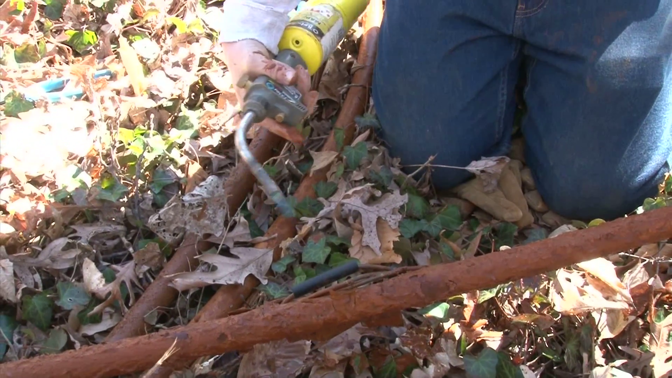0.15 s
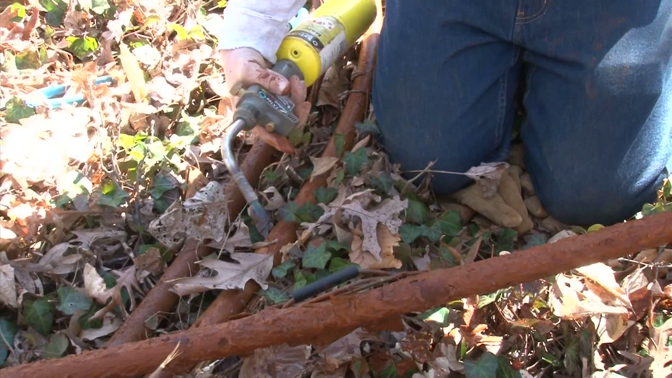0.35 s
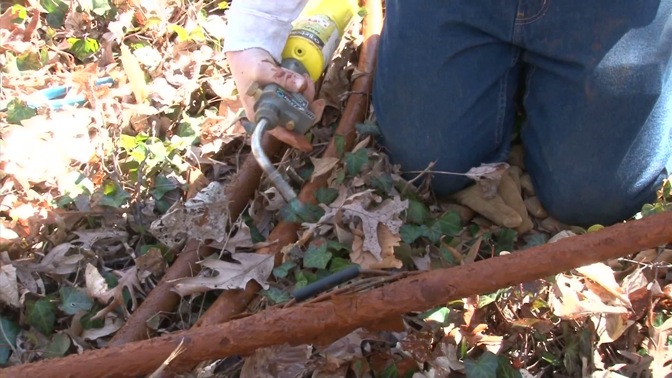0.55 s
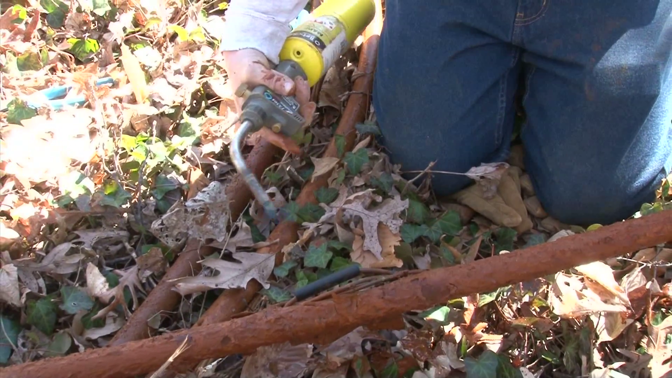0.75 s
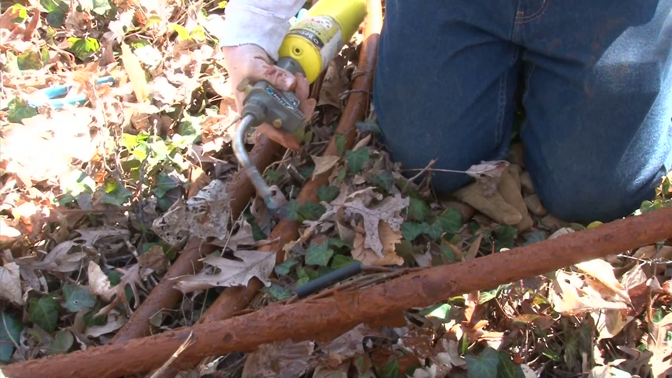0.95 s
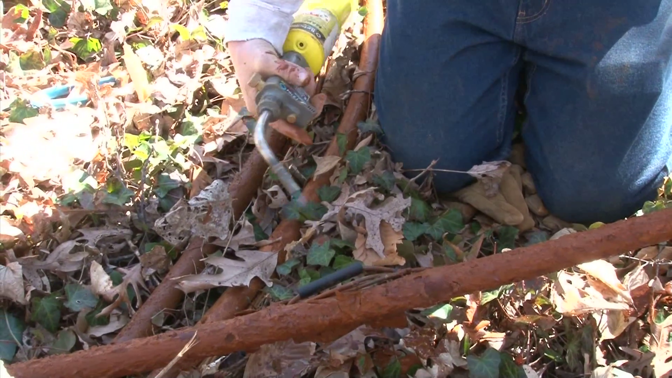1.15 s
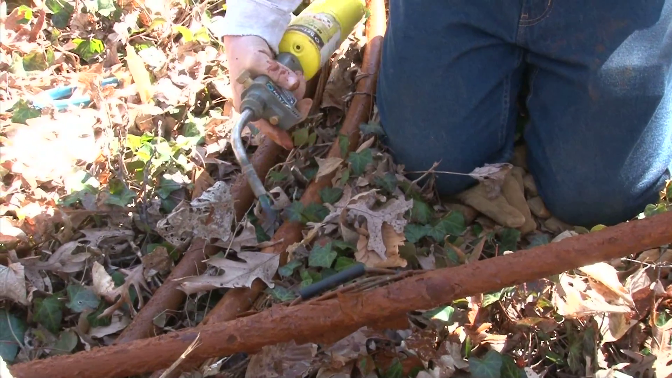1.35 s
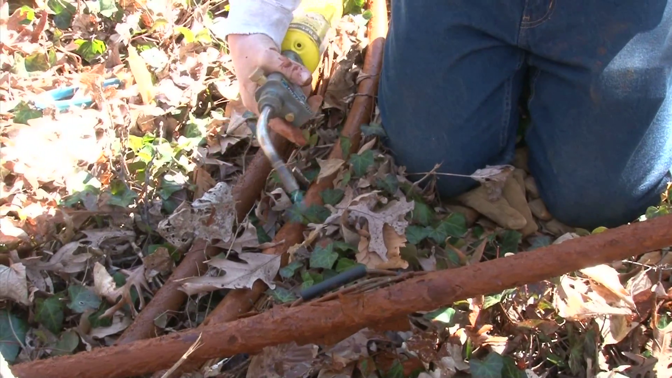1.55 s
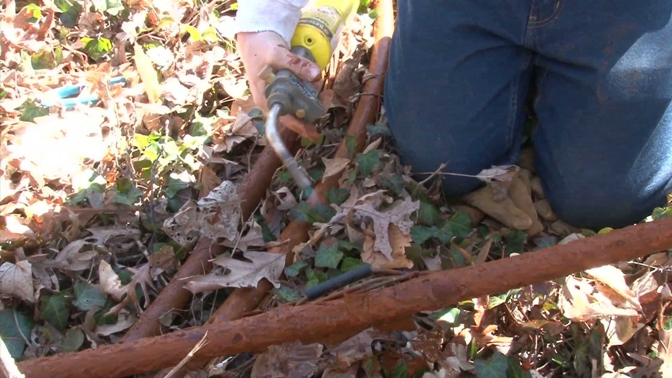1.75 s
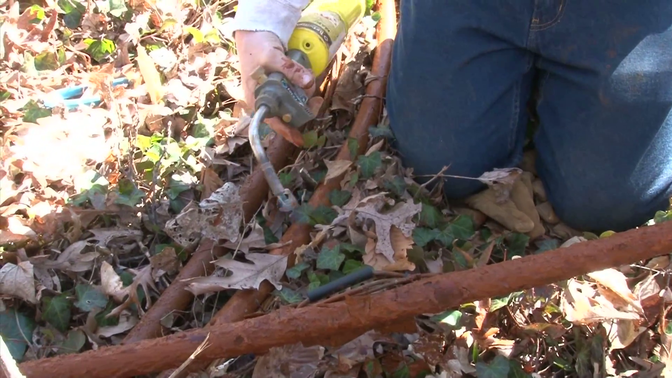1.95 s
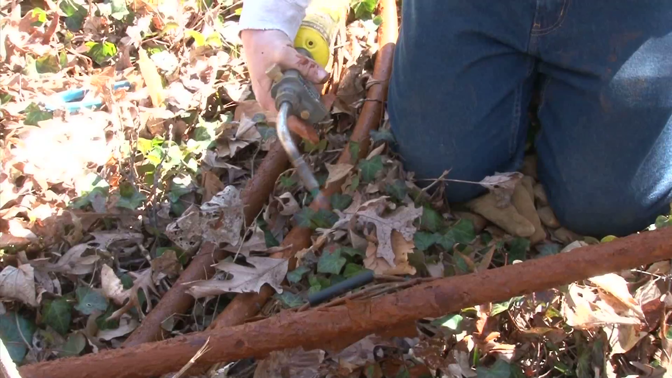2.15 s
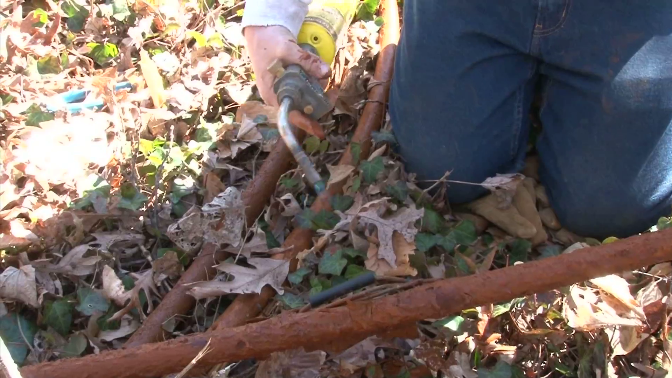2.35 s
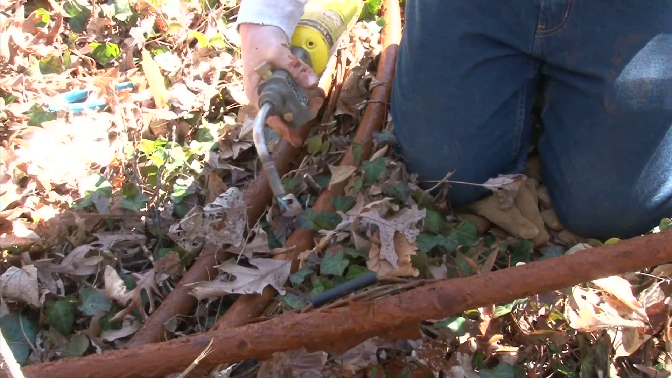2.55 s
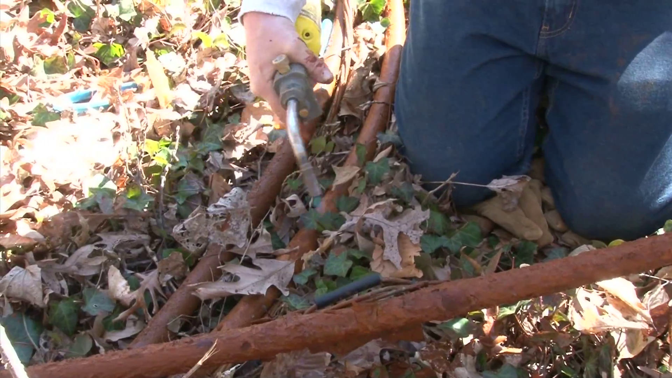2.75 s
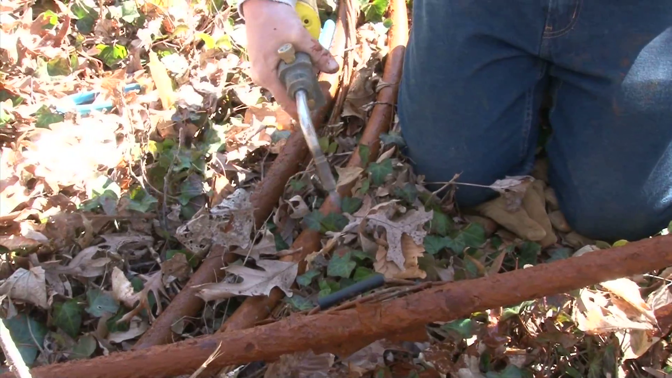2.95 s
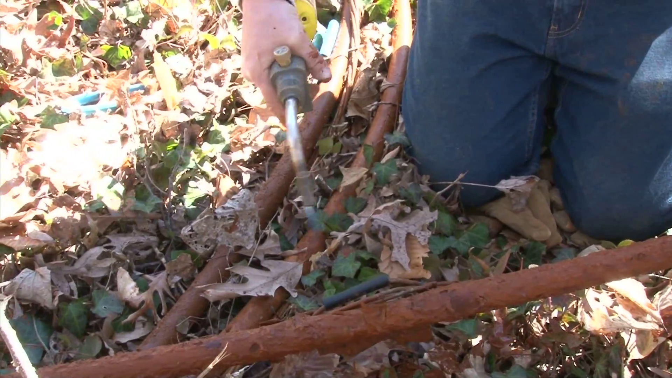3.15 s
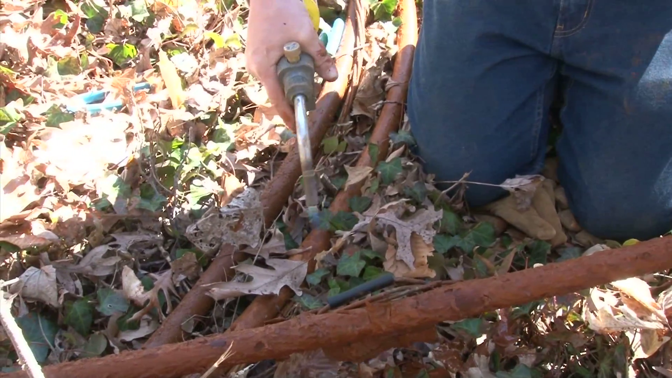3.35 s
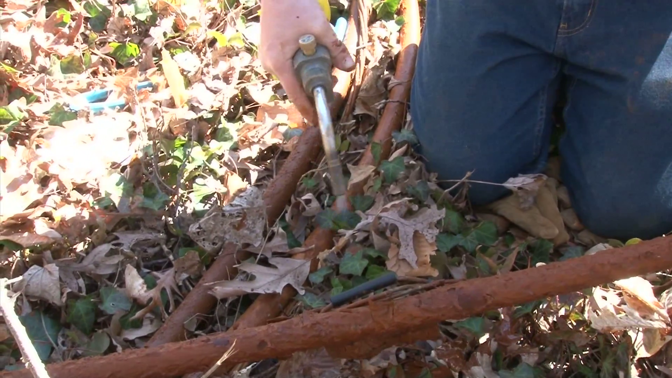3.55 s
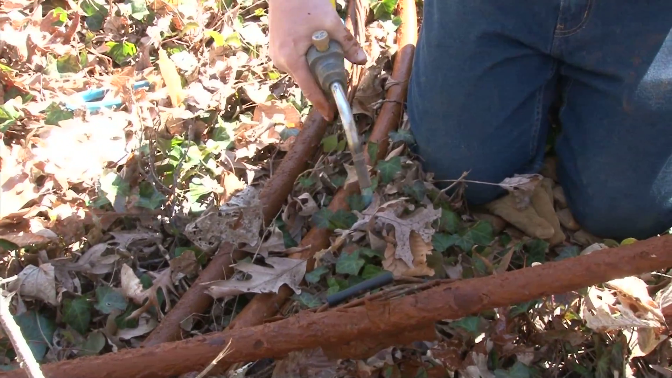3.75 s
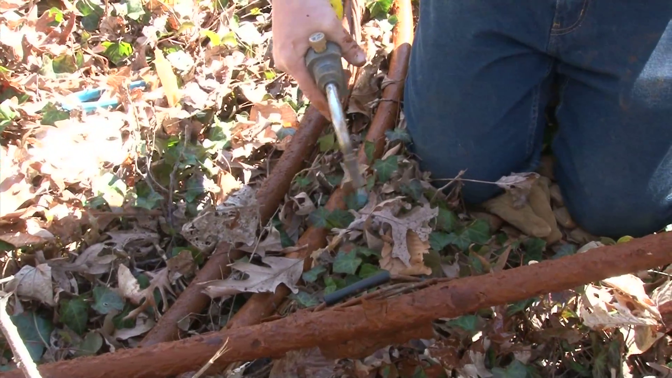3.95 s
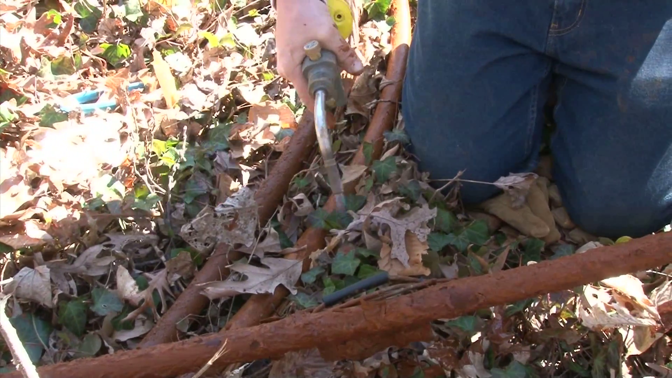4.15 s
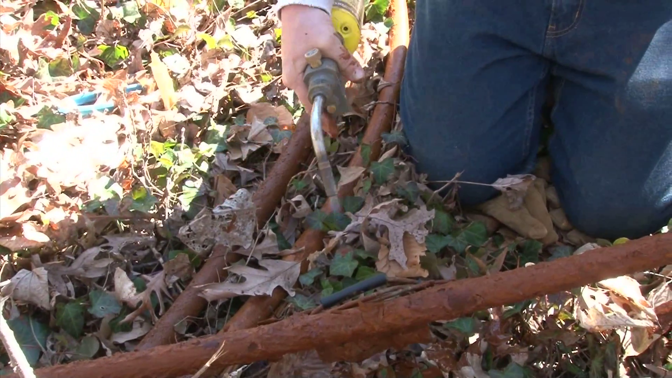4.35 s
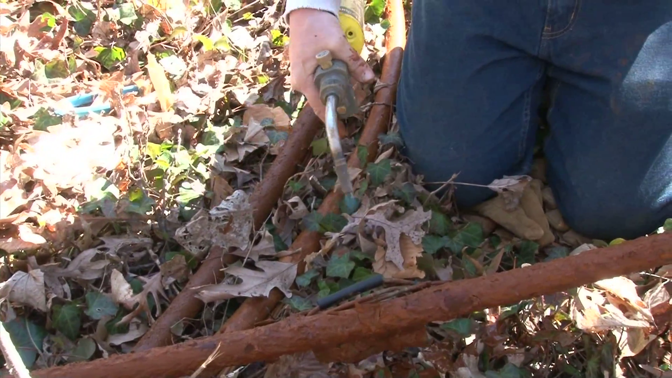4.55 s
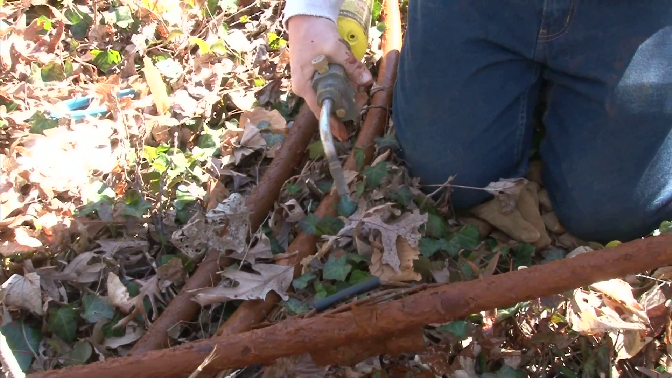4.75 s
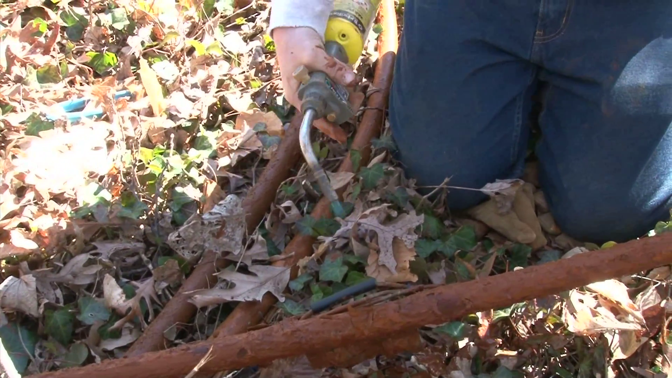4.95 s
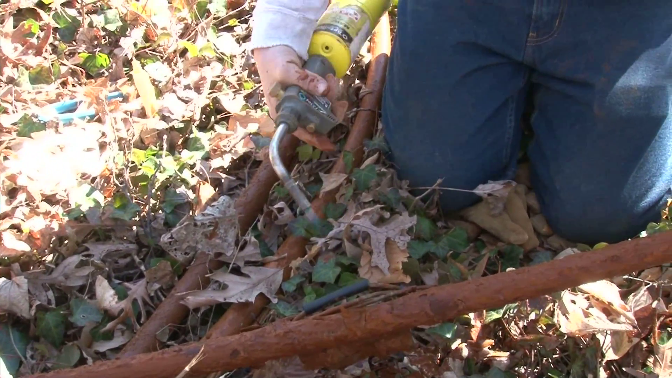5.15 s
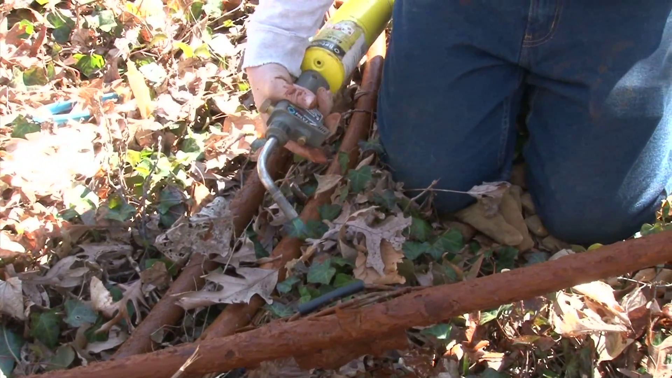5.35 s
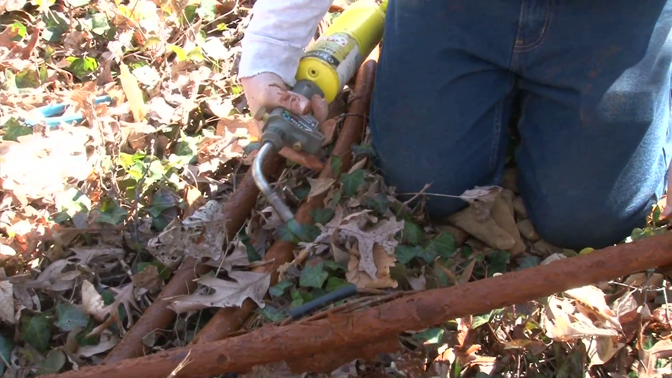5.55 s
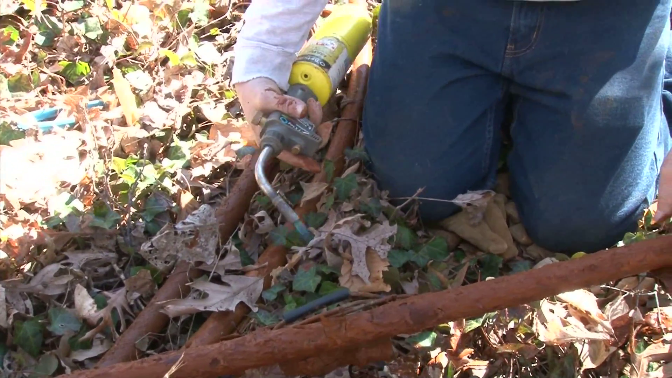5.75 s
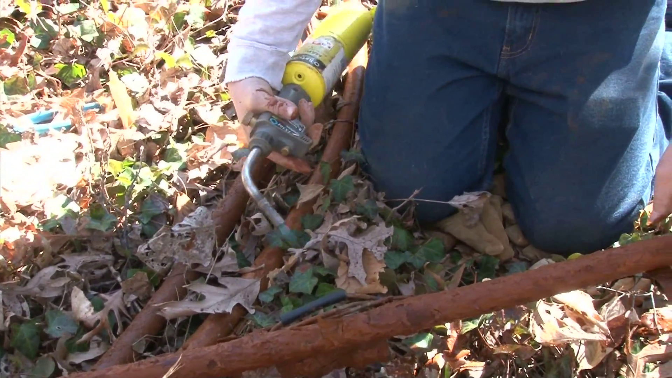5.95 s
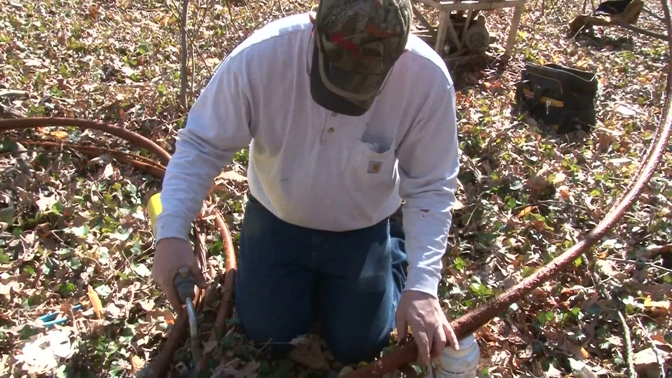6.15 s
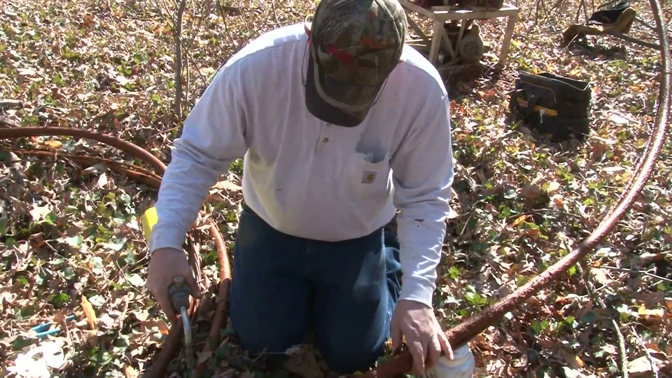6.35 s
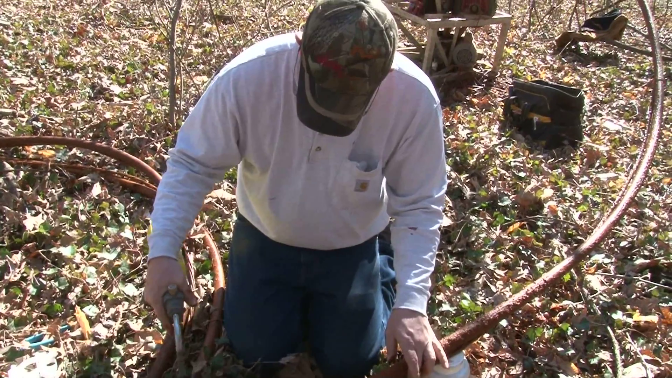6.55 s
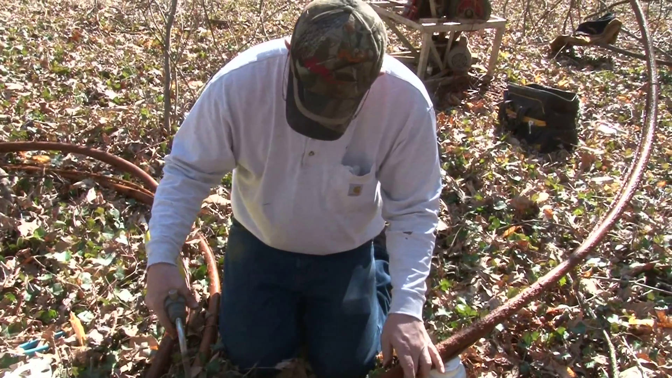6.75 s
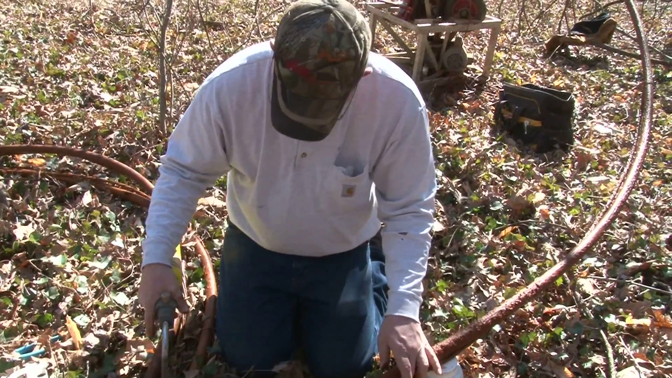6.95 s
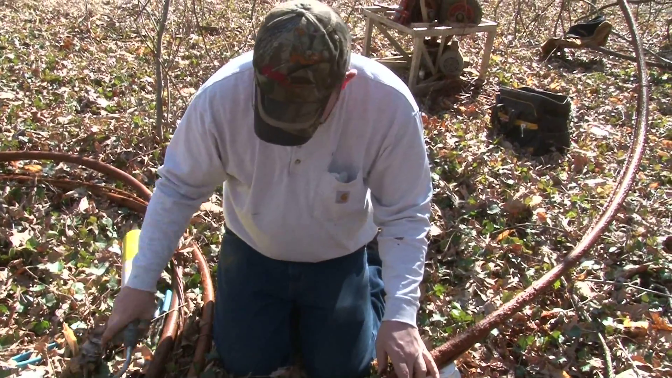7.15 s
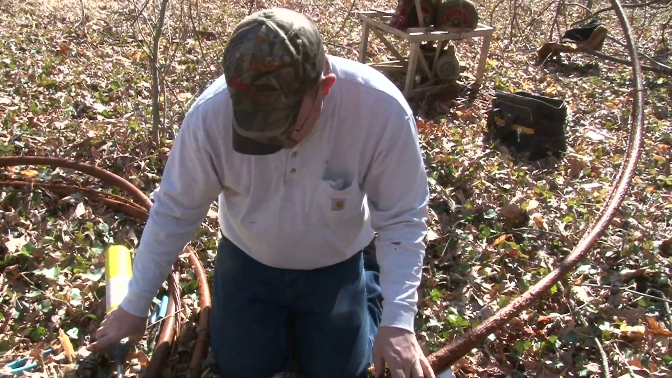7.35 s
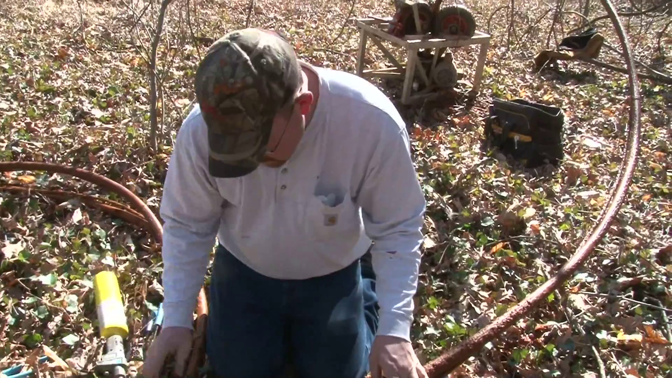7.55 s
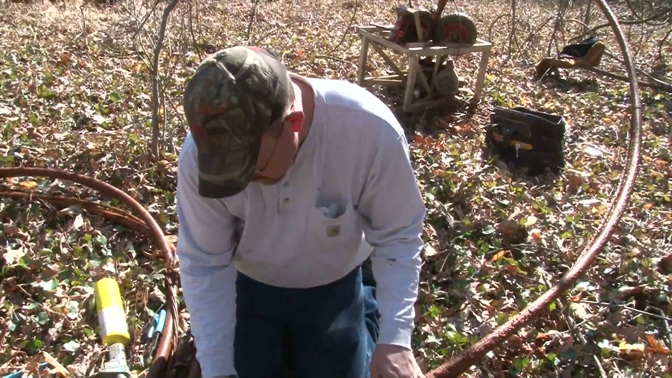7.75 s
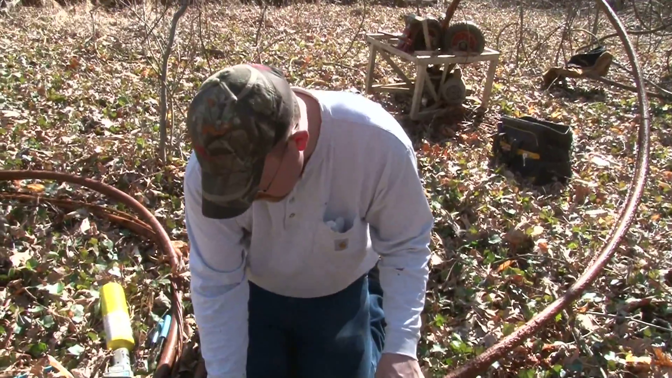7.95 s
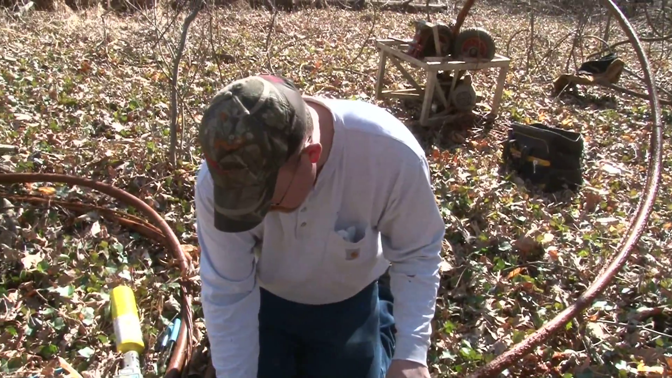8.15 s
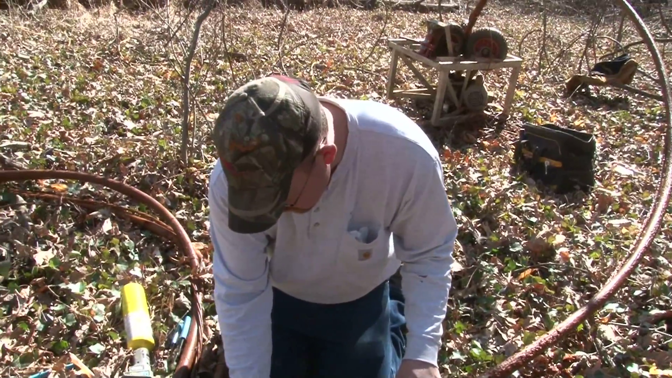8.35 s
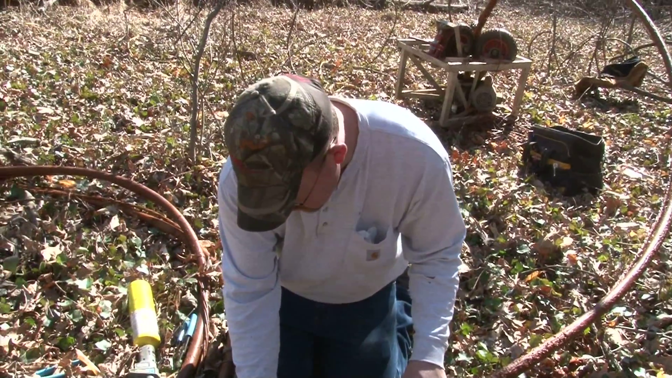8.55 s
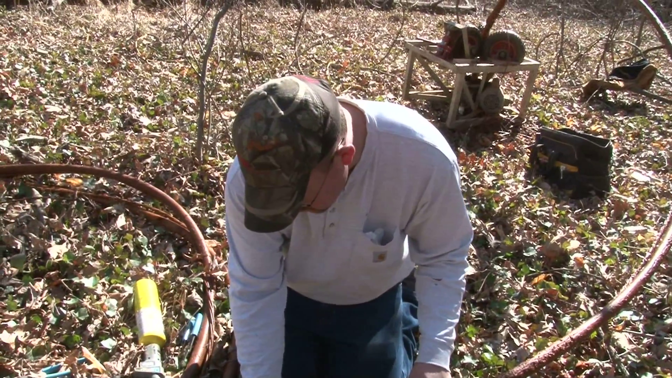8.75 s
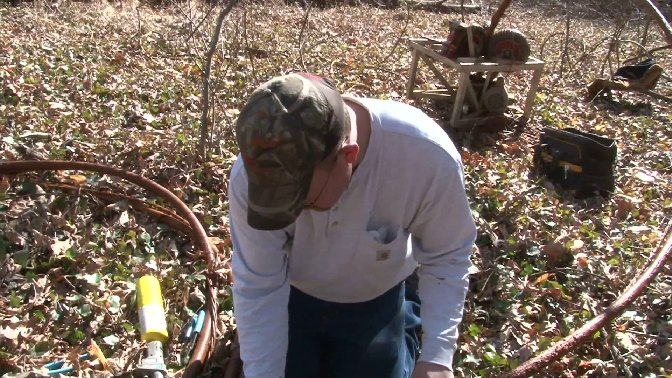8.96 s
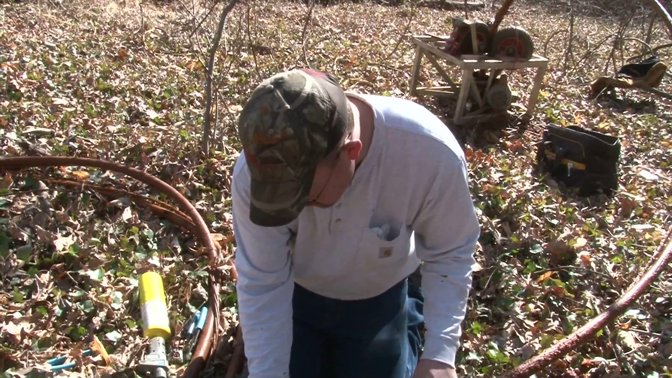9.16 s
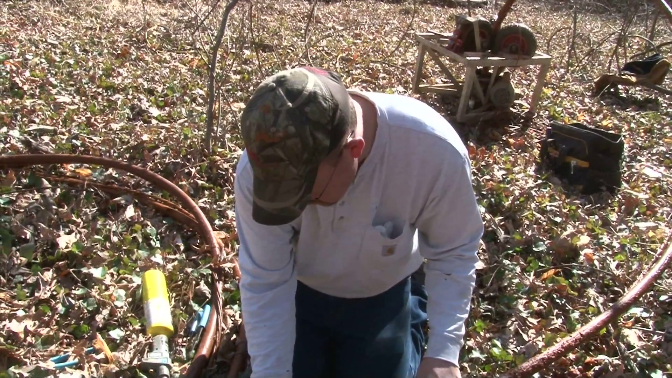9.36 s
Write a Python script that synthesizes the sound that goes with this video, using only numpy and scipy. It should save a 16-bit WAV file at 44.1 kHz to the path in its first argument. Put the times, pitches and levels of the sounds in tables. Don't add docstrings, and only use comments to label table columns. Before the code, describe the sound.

A handheld gas torch roars and hisses close by outdoors, sweeping with each stroke, then snaps shut, leaving crackling dry leaves over faint traffic.

```python
import sys
import numpy as np
from scipy import signal
from scipy.fft import rfft, irfft, next_fast_len
from scipy.io import wavfile
from scipy.ndimage import uniform_filter1d

SR = 44100
rng = np.random.default_rng(int(sys.argv[2]) if len(sys.argv) > 2 else 0)


def level_to_linear(level):
    exponent = np.asarray(level, float) / 20
    return 10 ** exponent


def wrap_up_sound(samples):
    columns = np.atleast_2d(samples).T
    tamed = np.clip(columns, -1, 1)
    steps = np.round(tamed * 32767).astype(np.int16)
    wavfile.write(sys.argv[1], SR, steps)


N = 414981
SIZE = next_fast_len(N, True)
HZ = np.maximum(np.arange(SIZE // 2 + 1) * SR / SIZE, 1)
TIME = np.arange(N) / SR
SIDES = np.array([[1], [-1]])
CUT_S, SHUT_S = 6.072, 7.027


def level(x, db):
    return x * level_to_linear(db) / np.sqrt(np.mean(x ** 2))


def shape(points):
    hz, db = np.transpose(points)
    return np.interp(np.log(HZ), np.log(hz), db)


def tint(x, db):
    return irfft(rfft(x, SIZE) * level_to_linear(db), SIZE)[..., :N]


def lowpass_db(hz, order):
    return -10 * np.log10(1 + (HZ / hz) ** order)


def highpass_db(hz, order):
    return -10 * np.log10(1 + (hz / HZ) ** order)


def curves(table):
    s, *columns = np.transpose(table)
    return [np.interp(TIME, s, c) for c in columns]


def walk(rate_hz):
    hold = int(SR / rate_hz)
    steps = np.repeat(rng.standard_normal(N // hold + 1), hold)
    return 1.18 * uniform_filter1d(uniform_filter1d(steps, hold), hold)[:N]


def bands(spectrum, centres_hz):
    for hz in centres_hz:
        away = np.clip(2 * np.log2(HZ / hz), -1, 1)
        yield hz, irfft(spectrum * np.cos(away * np.pi / 2) ** 2, SIZE)[..., :N]


# f/Hz, level/dB per Hz
TRAFFIC_SPECTRUM = [(13, -32), (22, -2), (80, 1), (170, -2), (293, -17), (653, -11), (1010, -12),
                    (1700, -16.5), (3600, -38.5), (4210, -35), (5050, -49), (7440, -49), (10700, -59.5),
                    (13900, -75), (22000, -120)]
# f/Hz, side minus mid/dB
TRAFFIC_WIDTH = [(60, -7), (110, -17.5), (190, -12), (330, -5), (590, -7.5), (1040, -5), (1850, -9.5),
                 (3270, -3.5), (5780, -11), (10200, -11)]


def traffic(level_db=-57, swell_db=1.4, flicker_db=0.4):
    mid, side = rfft(rng.standard_normal((2, N)), SIZE) * level_to_linear(shape(TRAFFIC_SPECTRUM))
    both = mid + side * level_to_linear(shape(TRAFFIC_WIDTH) - 2.5) * SIDES
    swell = swell_db * walk(1.265)
    out = 0
    for _, band in bands(both, 20 * 2 ** np.arange(0, 9.6, .5)):
        out = out + band * level_to_linear(swell + flicker_db * walk(8.8))
    return level(out, level_db)


# peak t/s, level/dB, time to fall 20 dB/s, left minus right/dB
SHIFTS = [(7.12, -65, 0, 1), (7.18, -67, 0, 2), (7.27, -68, .16, 1), (7.39, -69, -0.3, 1),
          (7.217, -60, .008, -1), (7.229, -59, .007, 1), (7.45, -63, .1, 2), (7.5, -51, 0.05, 1),
          (7.525, -42.5, 0.08, 0.5), (7.546, -41.5, 0.07, -1), (7.59, -51, 0.12, 1), (7.66, -50.5, 0.15, 1),
          (7.71, -50.5, 0.04, 0), (7.77, -61.5, 0.15, 2), (7.84, -58.5, 0.1, 1), (7.89, -52, 0, 0),
          (7.93, -51, 0.02, -1), (7.96, -54, 0.1, 0), (7.99, -57, 0.06, 0), (8.025, -61, 0.12, 0),
          (8.07, -62, 0.12, 0), (8.12, -68, .1, 0), (8.17, -66, 0.12, 1), (8.21, -68, .1, 1),
          (8.26, -63, 0, 0), (8.33, -65.5, 0.12, 0), (8.39, -70, .1, 0), (8.445, -59.5, 0, 6),
          (8.478, -55.5, 0.03, 5), (8.51, -65, .06, 4), (8.58, -69, .1, 0), (8.62, -68, .08, 0),
          (8.685, -57.5, 0.04, -1), (8.74, -72, .08, 0), (8.8, -66.5, 0.15, 1), (8.86, -68, .06, 0),
          (8.94, -68, .08, 0), (9, -63.5, 0.12, 0), (9.08, -67.5, .04, 0), (9.17, -70, .06, 0),
          (9.24, -67, 0.04, 1), (9.4, -70, .04, 4)]


def rustle(rise_share=0.91, roundness=1.1, stir_db=-76):
    power = level_to_linear(stir_db) ** 2 * np.ones((2, N))
    for s, db, fall_s, pan_db in SHIFTS:
        fall_s = max(fall_s, .005)
        i = slice(int((s - 3 * fall_s) * SR), int((s + 3 * fall_s) * SR))
        away = abs(TIME[i] - s) / np.where(TIME[i] < s, rise_share * fall_s, fall_s)
        power[:, i] += level_to_linear(db - 20 * away ** roundness + SIDES * pan_db / 2) ** 2
    return np.sqrt(power) * (TIME > SHUT_S)


# f/Hz, level/dB per Hz
LEAF_SPECTRUM = [(90, -40), (180, -2), (300, -16), (506, -13), (615, 0), (854, -3), (1220, -1.5),
                 (2910, -4.5), (3590, -10), (7030, -6.5), (10700, -20.5), (13900, -51), (22000, -120)]
# t/s, peak level/dB, f/Hz, left minus right/dB
SNAPS = [(7.2157, -55, 2620, 10), (7.489, -50, 2750, 0), (7.4962, -43, 2750, 3), (7.5197, -37, 2850, 2),
         (7.531, -36, 4250, 3), (7.538, -36, 2900, 1), (7.544, -42, 1400, 1), (7.553, -39, 4200, 5),
         (7.584, -46, 4200, 1), (7.598, -46, 2700, 1), (7.6553, -47, 6700, 1), (7.672, -49, 6800, 0.5),
         (7.718, -44, 7000, 0.5), (7.9242, -50, 4460, 2), (7.94, -50, 4500, 0.5), (7.6509, -48, 7200, 2),
         (7.7007, -43, 4100, 0.0), (7.7771, -66, 3990, -5), (7.8873, -49, 6050, -2), (7.889, -52, 7200, 2),
         (7.9177, -47, 5770, 5), (7.9856, -53, 4410, 2), (8.1637, -58, 4470, 0.0), (8.2565, -61, 3060, 0.0),
         (8.1889, -63, 4350, 0), (8.3001, -63, 2750, 0), (8.6189, -62, 4240, 0), (7.952, -51, 4500, 0),
         (7.69, -50, 2700, 0), (8.4391, -53, 3120, 10), (8.4395, -56, 7200, 5), (8.467, -50, 4600, 10),
         (8.4726, -44, 3050, 6), (8.482, -52, 3200, 4), (8.501, -52, 3050, 7), (8.5802, -66, 7260, 0.0),
         (8.6715, -55, 2700, 0.0), (8.689, -51, 2930, 0.0), (8.8207, -62, 2610, 3), (8.9469, -60, 4120, 3),
         (8.9828, -57, 2900, 0.0), (9.0222, -57, 2630, 0.0), (9.0681, -61, 4330, 0.0),
         (9.0991, -53, 2790, -0.5), (9.1509, -51, 8600, 6), (9.2243, -55, 8500, 3), (9.3924, -60, 3040, -1),
         (9.362, -62, 6300, -1), (9.245, -61, 5600, 0), (9.187, -62, 4200, 0)]
BODY_HZ, CRISP_HZ = 2200, 5200
BODY_DB, BODY_GROWTH = -34, 0.37


def litter_bed(rate_hz=3000, spread_db=3.4, smear_s=0.0015):
    cracks = (rng.random(N) < rate_hz / SR) * level_to_linear(spread_db * rng.exponential(size=N).clip(0, 4))
    smear = np.exp(-np.arange(400) / SR / smear_s)
    grain = np.sqrt(signal.fftconvolve(cracks ** 2, smear)[:N].clip(0))
    mid, side = grain * rng.standard_normal((2, N))
    return level(tint(mid + 0.35 * side * SIDES, shape(LEAF_SPECTRUM)), -3.1)


def leaves(snap_s=0.054):
    bed = litter_bed()
    body = tint(bed, lowpass_db(BODY_HZ, 6))
    crisp = tint(bed, highpass_db(CRISP_HZ, 6))
    middle = bed - body - crisp
    gain = rustle()
    heavy = (gain / level_to_linear(BODY_DB)) ** BODY_GROWTH
    out = gain * (body * heavy + middle * level_to_linear(1.4 * walk(45)) + crisp * level_to_linear(1.8 * walk(90)))
    for s, peak_db, hz, lean_db in SNAPS:
        t60 = snap_s * 3000 / hz
        noise = rng.standard_normal(1200) * np.exp(-np.log(1000) * np.arange(1200) / SR / t60)
        snap = signal.lfilter(*signal.iirpeak(hz, 5.5, SR), noise) + 0.03 * np.diff(noise, prepend=0)
        snap = snap / abs(snap).max()
        i = int(s * SR)
        out[:, i:i + 1200] += (level_to_linear(peak_db - 3.5 + SIDES * lean_db / 2) * snap)[:, :N - i]
    return out


def ring(s, hz, t60, soft_s=0.00084):
    out, t, i = np.zeros(N), np.arange(6000) / SR, int(s * SR)
    decay = np.exp(-np.log(1000) * t / t60)
    out[i:i + 6000] = np.sin(2 * np.pi * hz * t) * decay * -np.expm1(-t / soft_s)
    return out


# f/Hz, level/dB, t60/s
VALVE_MODES = [(227, 7, 0.017), (740, 3.5, 0.02), (2640, -7, 0.016), (3900, -15, .01), (4640, -13, .01),
               (6070, -12, 0.02), (8387, -22, 0.011)]
# t/s, level/dB, f/Hz, t60/s
KNOCKS = [
    (7.2375, -45, 1070, 0.071),
    (7.239, -42, 209, .04),
    (7.2585, -42, 960, 0.036),
    (7.261, -45, 240, .04),
]


def valve(click_s=7.2145, click_db=-40.5):
    click = sum(level_to_linear(db) * ring(click_s, hz, t60) for hz, db, t60 in VALVE_MODES)
    rattle = sum(level_to_linear(db) * ring(s, hz, t60, soft_s=0.0022) for s, db, hz, t60 in KNOCKS)
    return level_to_linear(click_db) * click + rattle


# f/Hz, level/dB
SCATTER_NEAR = [(80, -26), (400, -24.5), (600, -38.5), (1000, -13.5), (1800, -24), (2500, -16.5),
                (3700, -18), (5200, -16.5), (6500, -26), (10000, -48.5)]
SCATTER_FAR = [(80, -25), (500, -27), (1000, -15.5), (2900, -20.5), (3650, -6), (4500, -15), (5200, -6),
               (6000, -22), (10000, -24)]


def scatter(x, lag_ms=21):
    late = np.roll(x, int(lag_ms * SR / 1000))
    return SIDES * np.where(TIME < CUT_S, tint(late, shape(SCATTER_NEAR)), tint(late, shape(SCATTER_FAR)))


# t/s, lag/ms, echo share/0-1
GROUND = [(0, 1.21, 0.35), (1, 1.28, 0.39), (1.7, 1.37, 0.44), (2.6, 1.357, 0.49), (3.5, 1.486, 0.58),
          (4.1, 1.445, 0.54), (4.7, 1.36, 0.51), (5.4, 1.225, 0.38), (6.071, 1.196, 0.31),
          (6.073, 1.52, 0.36), (6.6, 1.5, 0.67), (7.2, 1.45, 0.33)]
LITTER_HZ, LITTER_TURN_RAD = 3060, 0.69
PORT_LAG_MS = 0.032
NEAR_HZ = 3140


def delayed(x, lag_ms):
    n = np.arange(N)
    return np.interp(n - lag_ms * SR / 1000, n, x)


def ground(x, near_db=-15, drift_ms=0.172, wide=0.3, count=5):
    lag_ms, share = curves(GROUND)
    litter = np.exp(-1j * LITTER_TURN_RAD) / np.sqrt(1 + (HZ / LITTER_HZ) ** 4)
    bounce = share * irfft(rfft(x, SIZE) * litter, SIZE)[:N]
    out = x + np.array([delayed(bounce, lag_ms + side * PORT_LAG_MS) for side in (-1, 1)])
    treble = tint(x, highpass_db(NEAR_HZ, 4))
    for place, side in rng.random((count, 2)):
        echo_ms = 1.9 + 3.5 * place + drift_ms * walk(4) + 0.676 * (TIME > CUT_S)
        out = out + level_to_linear(near_db) * delayed(treble, echo_ms) * (1 + wide * (2 * side - 1) * SIDES)
    return out


# t/s, f/Hz, level/dB, upper ridge level/dB
RIDGES = [(0, 2278, -38.5, -39.5), (1, 2230, -37, -43), (2, 2177, -40.5, -61), (2.9, 2118, -39.5, -57),
          (3.6, 2057, -42.5, -61), (4.3, 2146, -42, -63), (5, 2250, -42.5, -56), (5.5, 2347, -39.5, -47),
          (6.071, 2336, -38, -49), (6.073, 2300, -51, -48), (7, 2486, -52, -61)]
RIDGE_WIDTH_HZ, UPPER_RATIO, LOWER_RATIO, LOWER_DB = 204, 1.3, .69, -4.5


def ridges():
    hz, main_db, upper_db = curves(RIDGES)
    breath = tint(rng.standard_normal((3, 2, N)), lowpass_db(RIDGE_WIDTH_HZ / 2, 6))
    phase = 2 * np.pi * np.cumsum(hz) / SR
    notes = 0
    ratios, dbs = (1, UPPER_RATIO, LOWER_RATIO), (main_db, upper_db, main_db + LOWER_DB)
    for ratio, db, (a, b) in zip(ratios, dbs, breath):
        note = a * np.cos(ratio * phase) + b * np.sin(ratio * phase)
        notes = notes + level_to_linear(db) * level(note, 0)
    return notes * level_to_linear(-400 * (TIME - SHUT_S).clip(0))


# t/s, level/dB
AIM = [(0, 2.5), (1.5, 1.5), (2.5, -0.5), (3.7, -0.5), (4.6, 0), (5.3, 0), (6.071, 3), (6.073, -1),
       (6.7, -5), (7, -2)]
# t/s, jet level/dB, hiss level/dB
STROKES = [(.2, 0.5, 0.5), (.53, 1, 4.5), (.83, 0.5, 4.5), (1.17, 2, 5.5), (1.52, 2.5, 4), (1.8, 3, 5),
           (2.1, 5, 2), (2.37, 3.5, 1), (2.7, 4, 0.5), (2.98, 2, 3), (3.32, 2, 4), (3.55, 0, 0.5),
           (3.85, -0.5, 0.5), (4.25, -1, 1.5), (4.46, -2, -1), (4.75, -2, 2), (5.4, 2, 1.5), (5.9, 0.5, 3),
           (6.26, 1, 2)]
STROKE_S, JET_LEAD_S = 0.097, 0.065
AIM_SHARE, REST_DB, FADE_DB_PER_S = (0.05, 0.72, 1.11), (0, 0, -2), (206, 406, 416)


def controls():
    def bump(s):
        return np.exp(-((TIME - s) / STROKE_S) ** 2)

    jet = sum(jet_db * bump(s - JET_LEAD_S) for s, jet_db, _ in STROKES)
    hiss = sum(hiss_db * bump(s) for s, _, hiss_db in STROKES)
    aim = np.outer(AIM_SHARE, curves(AIM)[0])
    fade = np.outer(FADE_DB_PER_S, (TIME - SHUT_S).clip(0))
    return aim - fade + np.array(REST_DB)[:, None] + [0 * jet, jet, hiss]


LAYER_HZ = (525, 2020, 5400)
# f/Hz, level/dB per Hz
BURN = [(24, -53), (40, -37.5), (192, 4), (299, 4.5), (386, -9.5), (744, -3.5), (1010, -7.5), (1540, -4),
        (1850, -7), (2130, -5), (3560, -12), (4000, -14.5), (6390, -12), (10700, -29.5), (13900, -75),
        (22000, -120)]


def flame(flutter_db=0.61, puff_db=0.46, flicker_db=0.75):
    moves_db = controls()
    gas = rfft(rng.standard_normal(N), SIZE) * level_to_linear(shape(BURN))
    gas = gas / np.sqrt(np.mean(irfft(gas) ** 2))
    eddies_db = flutter_db * walk(160) + puff_db * walk(25.07)
    out = 0
    for hz, band in bands(gas, 40 * 2 ** np.arange(0, 8.6, .5)):
        share = [np.interp(np.log(hz), np.log(LAYER_HZ), row) for row in np.eye(3)]
        flicker = flicker_db * (1 + hz / 9000) * walk(14)
        out = out + band * level_to_linear(share @ moves_db + min(hz / 1800, 1) * eddies_db + flicker)
    return out * level_to_linear(-29.5)


def scene():
    rest = traffic() + leaves() + valve()
    torch = flame() + ridges()
    return ground(torch) + scatter(torch) + rest


# f/Hz, width/Hz, level/dB, slide/Hz
HOLLOWS = [(3575, 100, -7.5, 25), (4600, 110, -5.5, 50), (4840, 120, -4.5, 60), (5680, 120, -4.5, 80),
           (2620, 82, -2.5, 80), (3200, 60, -1, 50)]
HOLLOW_AIM, HOLLOW_BREAK, HOLLOW_AFTER = 0.16, .6, 0.38
MOTTLE_DB, MOTTLE_HZ = 1.7, 3500


def hollows(hz, s, count=9):
    at = (s * SR).astype(int).clip(0, N - 1)
    depth = np.where(s < CUT_S, 1 - HOLLOW_AIM * curves(AIM)[0][at], HOLLOW_AFTER * (s > SHUT_S))
    db = 0
    for f, width, deep_db, slide in HOLLOWS:
        deep = deep_db * (depth * (1 + HOLLOW_BREAK * walk(16)[at])).clip(0, 1.6)
        db = db + deep * np.exp(-2 * ((hz[:, None] - f - slide * walk(7)[at]) / width) ** 2)
    patches = uniform_filter1d(rng.standard_normal(db.shape), count, axis=0)
    patches = uniform_filter1d(patches, size=2, axis=1)
    onset = 1 / np.sqrt(1 + (MOTTLE_HZ / (hz[:, None] + 1)) ** 4)
    return level_to_linear(db + MOTTLE_DB * patches / patches.std() * onset)


# f/Hz, level/dB
WEAK = [(2200, -20), (3500, -12), (6000, -10), (9000, -7.5), (10300, -8), (11000, -3)]
# f/Hz, level/dB
NARROW = [(300, -40), (500, -22), (750, -19), (950, -22), (1400, -18), (1800, -10.5), (2250, -14),
          (2700, -13.5), (3250, -6.5), (3700, -12), (3950, -9), (4400, -12), (4800, -8.5), (5100, -13),
          (5800, -4), (11000, -2)]
NARROW_CHANCE_DB = 2.5


def gate(x, size=2048, count=7, order=8):
    hz, s, z = signal.stft(x, SR, "cosine", size)
    z = z * hollows(hz, s)
    mid, side = z.mean(0), (z[0] - z[1]) / 2
    power = abs(mid) ** 2

    def spread(rows):
        return np.repeat(rows, order, axis=0)[:len(hz)]

    def band(p):
        sums = np.add.reduceat(p, np.arange(0, len(hz), order))
        return spread(uniform_filter1d(sums, size=2))

    weak_db = np.interp(hz, *np.transpose(WEAK), left=-200)[:, None]
    bar = uniform_filter1d(power, 12 * count, axis=0) * level_to_linear(weak_db) ** 2
    strong = uniform_filter1d(power, count, axis=0) > bar
    chance = spread(rng.standard_normal((len(hz) // order + 1, len(s))))
    narrow_db = np.interp(hz, *np.transpose(NARROW))[:, None] + NARROW_CHANCE_DB * chance
    kept = band(abs(side) ** 2) > band(power) * level_to_linear(narrow_db) ** 2
    z = (mid + side * kept * SIDES[..., None]) * strong
    return signal.istft(z, SR, "cosine", size)[1][:, :N]


def top_cut(x):
    return signal.sosfilt(signal.butter(12, 10960, fs=SR, output="sos"), x)


# f/Hz, width/Hz, level/dB
HOUSING_NEAR = [(385, 102, -4), (765, 70, 3), (1254, 290, -2), (1670, 130, 2), (2390, 140, 1.5),
                (3040, 180, 1.5), (3572, 160, -5), (4170, 360, 3.5), (4690, 230, -5.5), (5295, 280, 3.5),
                (5770, 370, -2.5), (6040, 170, 0), (9540, 540, -5), (9990, 310, 3.5)]
HOUSING_FAR = [(384, 120, -8), (800, 270, 3), (910, 67, -2), (1400, 130, 3), (1600, 190, -5),
               (2300, 180, 3.5), (2900, 136, 7.5), (3420, 80, -4), (3830, 80, -2), (3370, 190, -6),
               (4330, 580, 10), (4760, 440, -8), (5700, 420, -5), (7200, 290, 1), (7950, 260, -2),
               (9300, 220, -1)]
# f/Hz, level/dB
LEAN = [(30, 4.5), (60, 3.4), (125, 2.4), (250, 1.6), (500, .3), (1000, -.3), (2000, .3), (4000, 0)]
# f/Hz, phase/rad
LEAD = [(20, -.2), (350, -0.2), (520, 0.13), (950, -0.29), (1300, -0.058), (3000, 0.036), (10400, 0.0)]
OFF_AXIS, FRONT, SIDE_SHARE = 0.25, 0.25, .3


def record(dry):
    def housing(table):
        return sum(db * np.exp(-2 * ((HZ - hz) / width) ** 2) for hz, width, db in table)

    near_db, far_db = housing(HOUSING_NEAR), housing(HOUSING_FAR)
    around_db = OFF_AXIS * far_db + FRONT * near_db * (HZ > 2200)
    ports_db = SIDES * shape(LEAN) / 2 - 30 * np.clip((HZ - 10620) / 500, 0, 3) ** 2
    ports = level_to_linear(ports_db) * np.exp(.5j * SIDES * shape(LEAD))
    left, right = rfft(dry, SIZE) / 2

    def hear(db):
        mid = (left + right) * level_to_linear(db)
        side = SIDES * (left - right) * level_to_linear(SIDE_SHARE * db)
        return irfft(ports * (mid + side), SIZE)[:, :N]

    after_cut = np.where(TIME < SHUT_S + .075, hear(far_db), hear(around_db))
    mix = gate(np.where(TIME < CUT_S, hear(near_db), after_cut))
    return top_cut(mix)


dry = scene()
out = record(dry)
wrap_up_sound(out)
```